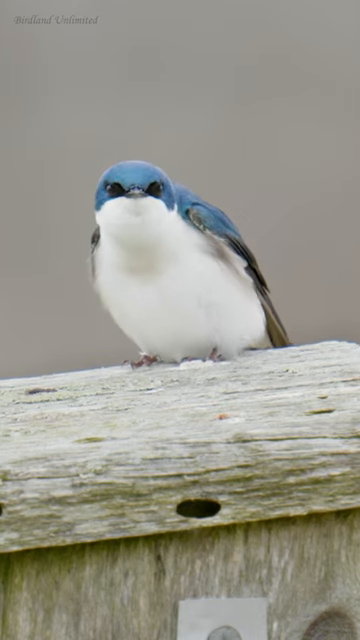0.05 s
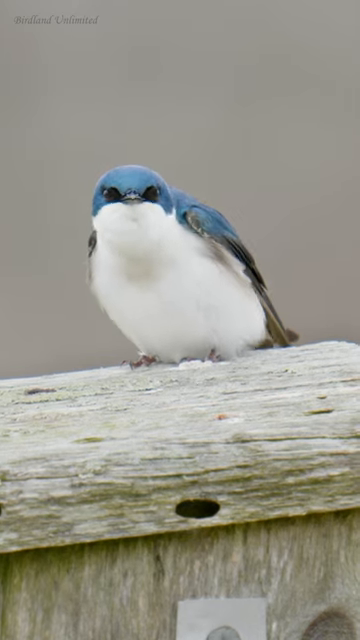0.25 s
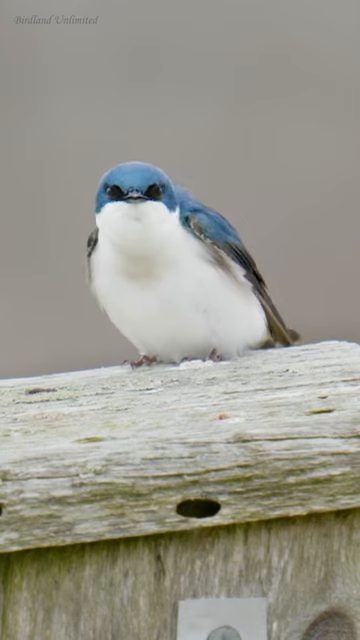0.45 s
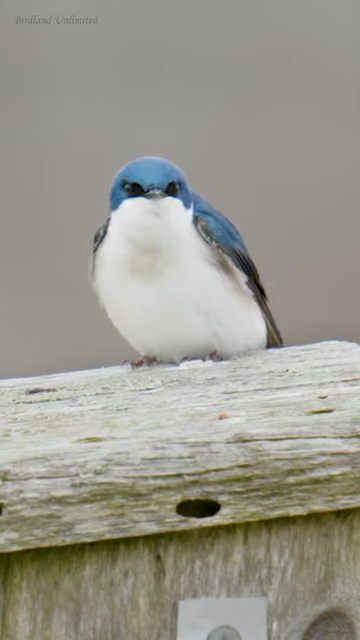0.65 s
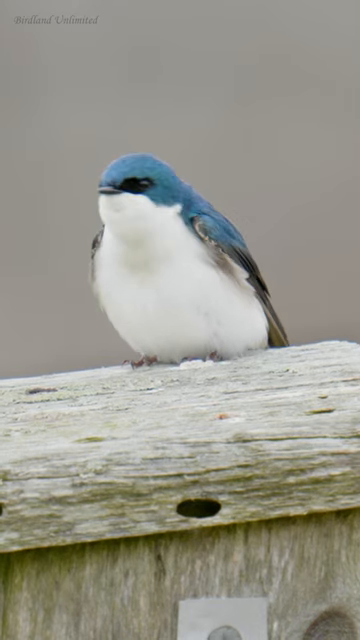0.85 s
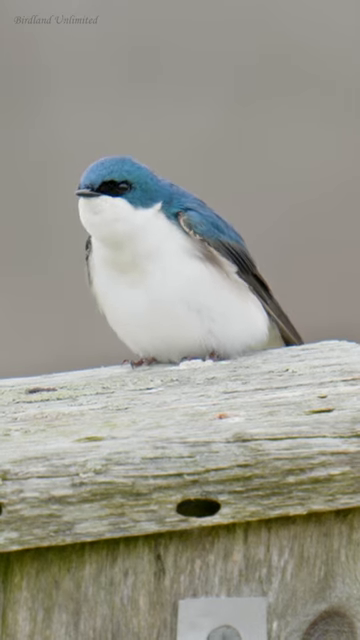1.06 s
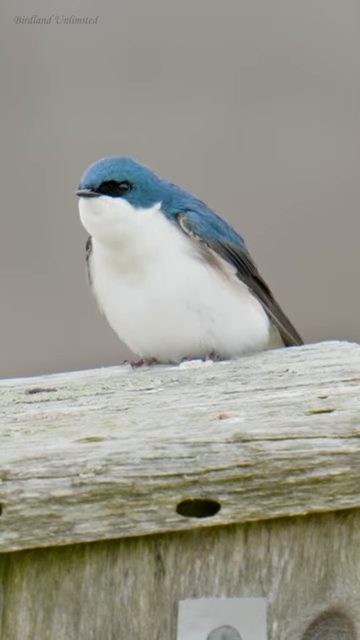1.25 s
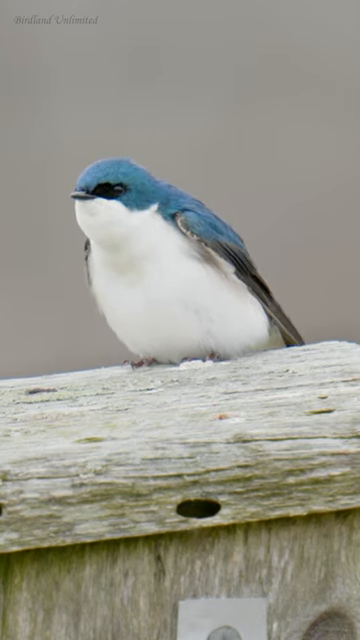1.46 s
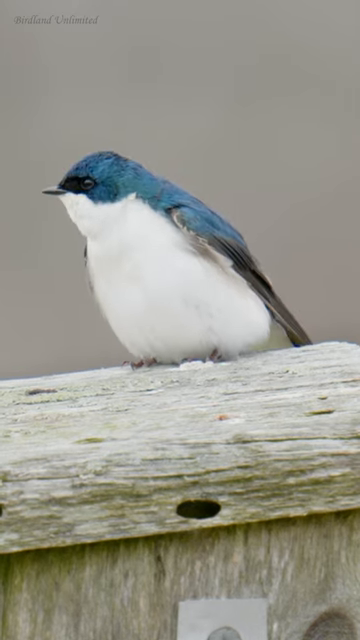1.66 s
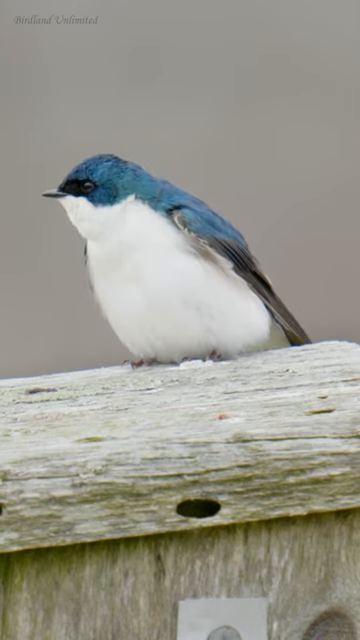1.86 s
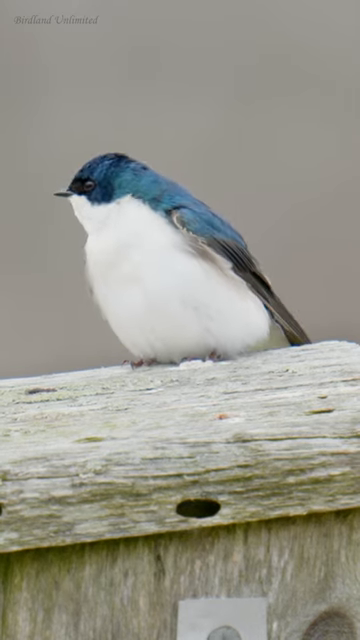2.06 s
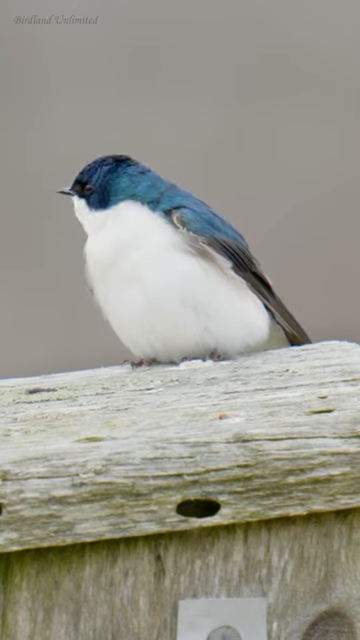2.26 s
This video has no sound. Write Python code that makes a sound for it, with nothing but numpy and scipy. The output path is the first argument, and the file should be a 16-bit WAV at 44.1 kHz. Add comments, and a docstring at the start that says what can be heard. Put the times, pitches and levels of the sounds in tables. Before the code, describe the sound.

Bright, rapid chirps come in two bursts from a nearby swallow on a wooden nest box. Then a quieter bird farther off whistles, buzzes and trills, and a faint rasp follows in the steady outdoor hush.

```python
"""A steady outdoor hush is heard first, with distant bird calls, faint ticks and soft low bumps.
Then a tree swallow on a wooden nest box gives two bursts of three chirps: nearly pure tones swept
in arches and quick downward slurs, with echoes from the wood. A farther bird answers with two
whistles, a buzz (fast modulation of one tone) and a trill (a rapid train of glides), and a short
distant rasp comes near the end. The farther a bird, the more reflections blur its song."""
import sys
import numpy as np
from scipy import signal
from scipy.fft import rfft, irfft
from scipy.io import wavfile

SR = 44100
rng = np.random.default_rng(int(sys.argv[2]) if len(sys.argv) > 2 else 0)


def dump_mix(stems):
    """Bounce the given channels to the path in sys.argv[1] as a 16-bit WAV at rate SR."""
    frames = np.atleast_2d(stems).T  # one column per channel
    limited = np.clip(frames, -1, 1)  # hard clip at full scale
    pcm = np.round(limited * 32767).astype(np.int16)
    wavfile.write(sys.argv[1], SR, pcm)


N = 105840


def undb(db):
    """Amplitude ratio of a level: a factor of ten for every 20 dB."""
    return 10 ** (np.asarray(db) / 20)


def curve(rows, col=1):
    """Linear interpolation of one column against the first, t/s."""
    rows = np.array(rows)
    return np.interp(np.arange(N) / SR, rows[:, 0], rows[:, col])


def envelope(rows):
    """Amplitude envelope from the last column, level/dB; silent outside the rows."""
    t = np.arange(N) / SR
    return undb(curve(rows, col=-1)) * (t > rows[0][0]) * (t < rows[-1][0])


def gain_at(hz, spectrum):
    """Frequency response: rows of f/Hz, level/dB interpolated on a logarithmic frequency axis."""
    f, db = np.array(spectrum).T
    return undb(np.interp(np.log(hz + 1), np.log(f), db))


def unit(x):
    """Normalisation to a standard deviation of 1."""
    return x / np.std(x)


def noise(spectrum, size=N):
    """Spectral shaping: white noise weighted by a frequency response, at rms 1."""
    gain = gain_at(np.fft.rfftfreq(size, 1 / SR), spectrum)
    return unit(irfft(rfft(rng.standard_normal(size)) * gain, size))


def resonant_noise(hz, width_hz):
    """Resonance: white noise through two like resonators in cascade, at rms 1."""
    b, a = signal.iirpeak(hz, hz / width_hz, fs=SR)
    once = signal.lfilter(b, a, rng.standard_normal(N))
    return unit(signal.lfilter(b, a, once))


def walk(rate_hz, size=N):
    """Random modulation: standard normal values joined by straight lines."""
    return np.interp(np.arange(size) * rate_hz / SR, np.arange(4096), rng.standard_normal(4096))


def add(out, start, x):
    """Superposition: x is summed into out from a start time in seconds."""
    i = max(int(start * SR), 0)
    out[i:i + len(x)] += x[:max(N - i, 0)]


def phase_of(hz):
    """Phase as the time integral of frequency."""
    return 2 * np.pi * np.cumsum(hz) / SR


def glide(length, pitches, fullness, jitter):
    """Parabolic sweep through three frequencies, and an envelope that fullness flattens."""
    u = np.linspace(0, 1, int(length * SR))
    hz = np.polyval(np.polyfit([0, .5, 1], pitches, 2), u)
    env = np.tanh(fullness * np.sin(np.pi * u) ** 2) / np.tanh(fullness)
    return hz * (1 + jitter * walk(898, size=len(u))), env


def outdoors():
    """Broadband noise: a steady hush, and far bird chatter merged into a flickering band."""
    # spectral densities: f/Hz, relative level/dB
    hush_spectrum = [(25, -60), (50, -35), (100, -16.5), (200, -8), (290, -14), (500, -9.5), (800, -1.5),
                     (1150, -4.5), (1410, -5.5), (1750, -12.5), (2400, -14), (3300, -16.5), (15500, -20.5)]
    chatter_spectrum = [(700, -17.5), (1300, -2), (2000, -1), (2800, 2.5), (3600, -10.5), (4500, -21),
                        (8000, -29)]
    # slow course of the chatter: t/s, level/dB
    chatter_levels = [(0, -51), (.25, -47), (.45, -47.5), (.75, -52), (1.4, -53), (1.6, -57), (2.1, -56),
                      (2.25, -54), (2.4, -50.5)]
    hush = noise(hush_spectrum) * undb(-52.5 + 0.16 * walk(5.3))
    chatter = noise(chatter_spectrum) * undb(curve(chatter_levels) + 2.2 * walk(40))
    return hush + chatter


def far_birds():
    """Random frequency modulation makes the gliding notes of distant birds waver."""
    # notes: t/s, duration/s, first f/Hz, middle f/Hz, last f/Hz, relative level/dB
    notes = [(0, 0.084, 2500, 2500, 2650, -53), (.01, .13, 3000, 3550, 3590, -56.5),
             (0.106, 0.074, 2600, 2110, 1920, -54), (0.149, 0.069, 3000, 2750, 2650, -55),
             (0.186, 0.01, 6370, 5900, 5000, -54), (.722, 0.0475, 3080, 3000, 2750, -48),
             (.715, 0.068, 2500, 2350, 2250, -48.5), (1.444, 0.083, 2700, 1950, 1750, -52),
             (1.77, 0.059, 2580, 2250, 1860, -52.5), (2.205, 0.017, 3000, 3180, 3200, -48.5),
             (2.21, .03, 4300, 3980, 3600, -66), (2.27, .06, 2865, 2750, 2580, -46)]
    out = np.zeros(N)
    for start, length, *pitches, db in notes:
        hz, env = glide(length, pitches, fullness=12, jitter=.06)
        add(out, start, undb(db) * env * np.sin(phase_of(hz)))
    return out


def ticks(decay_s=.003):
    """Exponential decay of wide-band noise is heard as a faint tick."""
    # onsets: t/s, level/dB
    onsets = [(0.025, -42), (.144, -45.5), (2.318, -61)]
    env = np.zeros(N)
    for start, db in onsets:
        add(env, start, undb(db) * np.exp(-np.arange(N) / SR / decay_s))
    return env * resonant_noise(hz=3200, width_hz=4900)


def bumps():
    """Low resonant noise under half-sine envelopes is heard as soft bumps."""
    # swells: t/s, duration/s, level/dB
    swells = [(0.062, 0.19, -47.5), (0.261, 0.16, -58), (0.594, 0.051, -57), (1.222, 0.22, -57),
              (1.338, 0.033, -53.5)]
    env = np.zeros(N)
    for start, length, db in swells:
        add(env, start, undb(db) * np.sin(np.linspace(0, np.pi, int(length * SR))))
    return env * resonant_noise(hz=250, width_hz=260)


def thin_tones():
    """Faint, far-off sinusoids held with slight frequency modulation."""
    # tones: t/s, duration/s, f/Hz, level/dB
    tones = [(0.121, .058, 7620, -55), (0.405, 0.13, 3910, -51), (0.628, 0.29, 250, -65.5),
             (0.878, 0.12, 3655, -54.5), (1.37, 0.25, 239, -66), (2.301, 0.064, 2900, -43.5),
             (2.359, 0.036, 3000, -54)]
    out = np.zeros(N)
    for start, length, pitch, db in tones:
        hz, env = glide(length, (pitch, pitch, pitch), fullness=6, jitter=0.021)
        add(out, start, undb(db) * env * np.sin(phase_of(hz)))
    return out


def swallow():
    """Frequency sweeps a few milliseconds long, with weak second and third harmonics."""
    # arched notes: t/s, duration/s, f/Hz at both ends, f/Hz at the top, level/dB
    arches = [(0.2841, 0.02, 2500, 4150, -19), (0.3542, 0.0164, 2310, 3956, -19),
              (0.581, 0.0155, 2650, 4130, -18.5), (0.657, 0.015, 2330, 3890, -21.5)]
    # quick slurs: t/s, duration/s, first f/Hz, middle f/Hz, last f/Hz, level/dB
    slurs = [(.228, 0.0076, 3900, 3870, 3450, -33), (.24, 0.0085, 4920, 4640, 3670, -23),
             (0.2528, 0.0043, 4300, 4000, 3300, -28.5), (0.2619, 0.0061, 5200, 3640, 2500, -20),
             (.268, 0.0055, 3340, 2700, 1950, -29.5), (.304, 0.0071, 4500, 4880, 3900, -18),
             (0.3144, 0.008, 5100, 4420, 3400, -18.5), (.325, 0.0082, 4350, 3500, 2290, -25),
             (0.372, 0.0057, 4520, 4690, 3900, -19.5), (0.38, 0.0094, 5080, 4520, 3640, -19),
             (0.3912, 0.0061, 4300, 3900, 3000, -26.5), (.397, .0056, 4770, 3480, 2300, -20),
             (.522, 0.0083, 3900, 4300, 3200, -20.5), (0.5318, .011, 5100, 4486, 2730, -19),
             (0.5455, .0102, 4500, 3200, 2820, -22), (.598, 0.0078, 4260, 4880, 3900, -20.5),
             (0.608, 0.011, 5150, 4420, 3740, -21.5), (0.616, 0.01, 4300, 3200, 2950, -26.5),
             (0.6729, 0.0074, 4370, 4240, 3300, -21), (0.6832, 0.0082, 5070, 4436, 3550, -22.5),
             (0.6936, 0.0072, 4370, 3400, 2820, -22.5), (.70, 0.0057, 4640, 3710, 2480, -21)]
    # faint falling tone that ends each chirp: t/s
    trails = [.272, .332, .403, .555, .627, .706]
    trail_s, trail_hz, trail_db = 0.0091, (2650, 2250, 1850), -41.5
    arch_fullness, slur_fullness = 1.65, 4.6
    notes = [(t, length, (ends, top, ends), db, arch_fullness) for t, length, ends, top, db in arches]
    notes += [(t, length, pitches, db, slur_fullness) for t, length, *pitches, db in slurs]
    notes += [(t, trail_s, trail_hz, trail_db, slur_fullness) for t in trails]
    out = np.zeros(N)
    for start, length, pitches, db, fullness in notes:
        hz, env = glide(length, pitches, fullness, jitter=.014)
        phase = phase_of(hz)
        tone = np.sin(phase) + undb(-32.5) * np.sin(2 * phase) + undb(-38.5) * np.sin(3 * phase)
        add(out, start, undb(db) * env * tone)
    return out


def nest_box(song, wood_lag_s=.00077, box_lag_s=.0036):
    """Comb filtering: an image source in the wood under the bird, then a later echo from the box."""
    out = song.copy()
    add(out, wood_lag_s, undb(-10.5) * out)
    add(out, box_lag_s, undb(-21) * out)
    return out


def whistles():
    """A pure tone, then a higher one with partials at 1/2 and 3/2 of its frequency."""
    # contours: t/s, f/Hz, level/dB
    low_whistle = [(.738, 1370, -49), (.752, 1478, -42.5), (.786, 1408, -41.5), (.81, 1515, -40),
                   (.822, 1440, -54)]
    high_whistle = [(.822, 2482, -50), (0.833, 2497, -40), (.855, 2470, -30.5), (.868, 2486, -30),
                    (.881, 2373, -36.5), (.892, 2420, -56)]
    low, high = (phase_of(curve(w) * (1 + 0.0027 * walk(300))) for w in (low_whistle, high_whistle))
    partials = np.sin(high) + undb(-18.5) * np.sin(high / 2) + undb(-21) * np.sin(1.5 * high)
    return envelope(low_whistle) * np.sin(low) + envelope(high_whistle) * partials


def buzz(flutter_hz=255, depth=0.47):
    """Fast frequency and amplitude modulation puts sidebands around a low tone, then a high one."""
    # carrier contours: t/s, f/Hz, level/dB
    low_buzz = [(.922, 3200, -41), (.935, 2478, -36.5), (.955, 2315, -33), (.968, 2087, -39.5),
                (.98, 2077, -32.5), (.994, 2025, -59)]
    high_buzz = [(1.002, 4950, -49), (1.012, 4750, -41.5), (1.019, 3950, -43), (1.025, 3363, -30.5),
                 (1.042, 3306, -25.5), (1.06, 3278, -25.5), (1.076, 3170, -37)]
    out = np.zeros(N)
    for contour, swing, jitter in (low_buzz, 0.071, .2), (high_buzz, 0.094, 0.078):
        flutter = phase_of(flutter_hz * (1 + jitter * walk(200)))
        hz = curve(contour) * (1 + swing * np.sin(flutter))
        throb = (1 - depth * np.cos(flutter)) / (1 + depth)
        out += envelope(contour) * throb * np.sin(phase_of(hz))
    return out


def trill(count=20, start_s=1.0775, period_s=.0168, slowing_s=.00012, flutter_hz=235):
    """A slowing train of overlapping sweeps, roughened by amplitude modulation."""
    # course of the trill: t/s, relative level/dB
    levels = [(1.07, -38), (1.15, -35.5), (1.28, -33.5), (1.36, -35.5), (1.42, -35)]
    # frequency response of the voice: f/Hz, level/dB
    voice = [(2000, -3), (2600, 2.5), (3100, 0), (3700, -5), (4400, -4), (5400, -5)]
    # parts of a syllable: lag/s, duration/s, nominal (first, middle, last) f/Hz, relative level/dB
    flick = (-0.0059, 0.0076, (5100, 4560, 4300), -12)
    fall = (0, .0125, (3900, 3000, 2210), 0)
    rise = (.0115, 0.01348, (2500, 3400, 3500), -9)
    out = np.zeros(N)
    for k in range(count):
        start = start_s + k * period_s + slowing_s * k * k / 2
        syllable_db = np.interp(start, *np.array(levels).T)
        lift = 1 + 0.062 * np.sin(np.pi * k / count)  # the pitch is highest in mid-trill
        parts = (flick, fall, rise) if k < count - 1 else (flick, fall)
        for lag, length, pitches, db in parts:
            detune, accent_db = rng.standard_normal(2) * (0.027, 0.82)
            hz, env = glide(length, np.array(pitches) * (lift + detune), fullness=3.3, jitter=0.054)
            gain = undb(syllable_db + db + accent_db) * gain_at(hz, voice)
            add(out, start + lag, gain * env * np.sin(phase_of(hz)))
    flutter = phase_of(flutter_hz * (1 + 0.129 * walk(150)))
    return out * (1 + .55 * np.sin(flutter))


def far_rasp(pulse_hz=238.3, band_hz=(1320, 2950)):
    """Source and filter: a distant bird's rasp is a nearly periodic pulse train, band-limited."""
    # envelope: t/s, relative level/dB
    levels = [(2.138, -56), (2.16, -43.5), (2.188, -41), (2.197, -56)]
    cycles = np.cumsum(pulse_hz * (1 + 0.016 * walk(250))) / SR
    pulses = np.diff(np.floor(cycles), prepend=0)
    band = signal.butter(5, band_hz, "band", fs=SR, output="sos")
    return unit(signal.sosfilt(band, pulses)) * envelope(levels)


def reflections(x, db, lag_s, decay_s):
    """Diffuse reflection from the surroundings: convolution with exponentially decaying noise."""
    # spectrum of the scattered sound: f/Hz, relative level/dB
    scatter = [(500, 0), (2800, -6), (4000, -8.5), (6000, -5.5), (15000, -30.5)]
    t = np.arange(SR // 2) / SR
    tail = noise(scatter, size=len(t)) * np.exp(-t / decay_s)
    out = np.zeros(N)
    add(out, lag_s, signal.fftconvolve(x, tail / np.linalg.norm(tail)))
    return undb(db) * out


def scene():
    """Superposition of all sources; the direct-to-reverberant ratio falls with a bird's distance."""
    near = nest_box(swallow())
    answer = whistles() + buzz()
    rattle = trill()
    far = far_birds() + far_rasp()
    birds = near + answer + rattle + undb(-2) * far
    early = (reflections(near, db=-21.5, lag_s=0.0049, decay_s=0.0097)
             + reflections(answer, db=-11, lag_s=0.0044, decay_s=0.026)
             + reflections(rattle, db=-6.5, lag_s=0.001966, decay_s=0.011)
             + reflections(far, db=-2.5, lag_s=0.002023, decay_s=0.0071))
    late = reflections(birds, db=-42.5, lag_s=.03, decay_s=.15)
    return (birds + early + late + thin_tones() + bumps() + ticks() + outdoors())[None]


def record(dry, low_hz=43, top_hz=15900):
    """Band limiting: the recorder thins the deep bass and cuts the top steeply."""
    high_pass = signal.butter(2, low_hz, "high", fs=SR, output="sos")
    low_pass = signal.ellip(10, .1, 70, top_hz, fs=SR, output="sos")
    return signal.sosfilt(low_pass, signal.sosfilt(high_pass, dry))


dry = scene()
out = record(dry)
dump_mix(out)
```